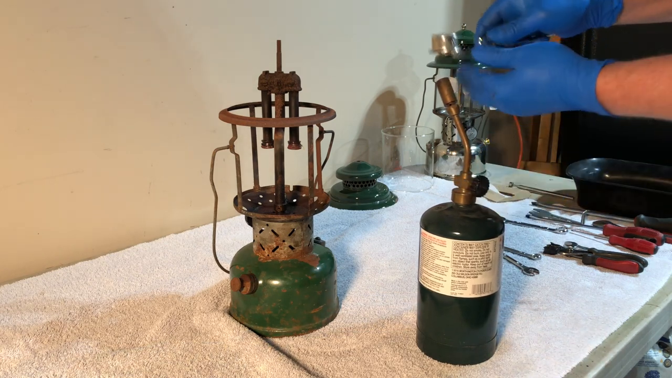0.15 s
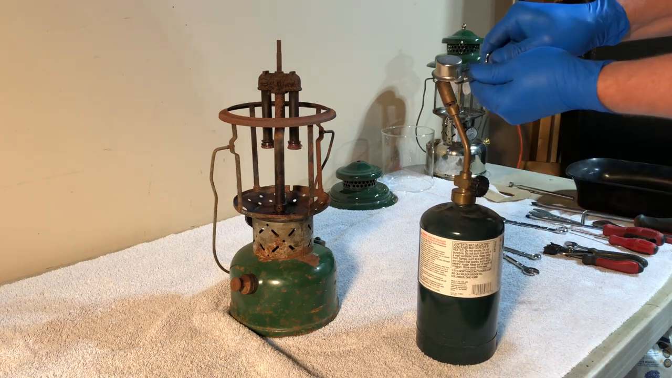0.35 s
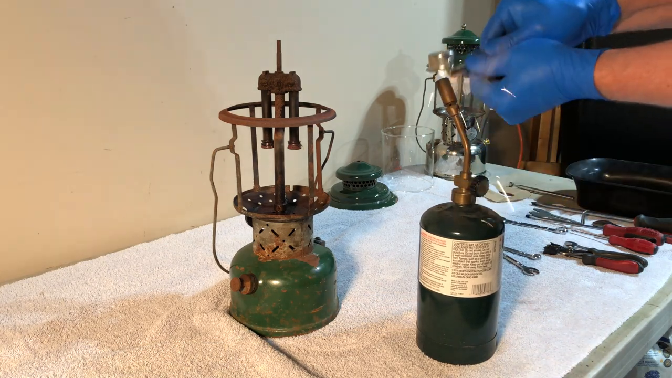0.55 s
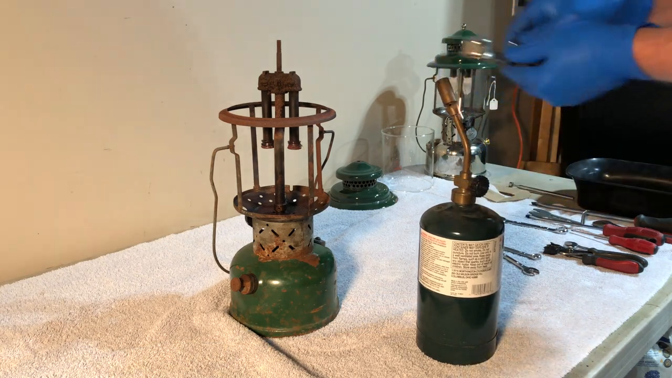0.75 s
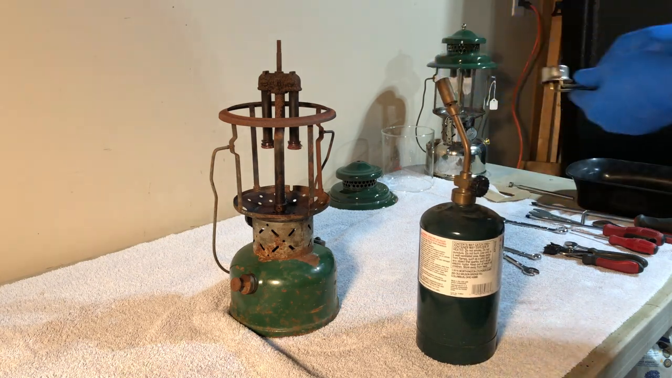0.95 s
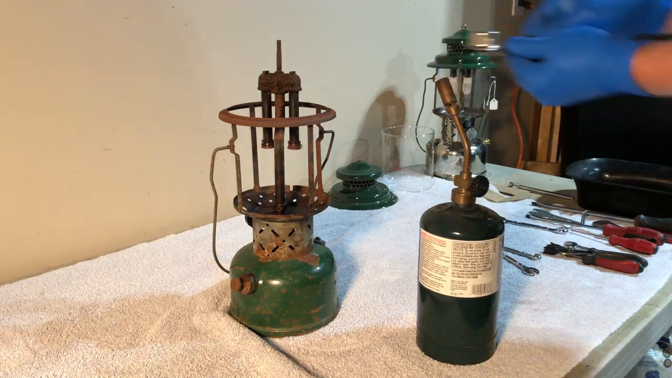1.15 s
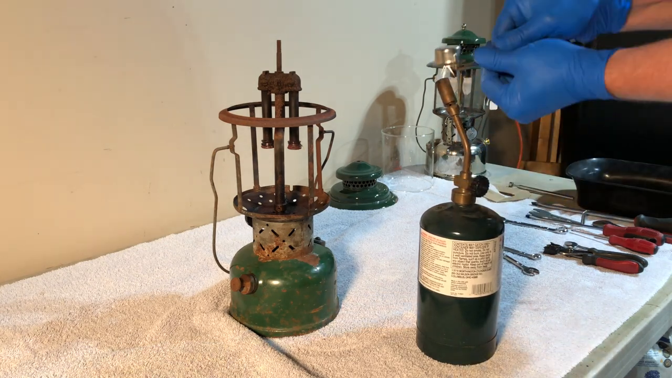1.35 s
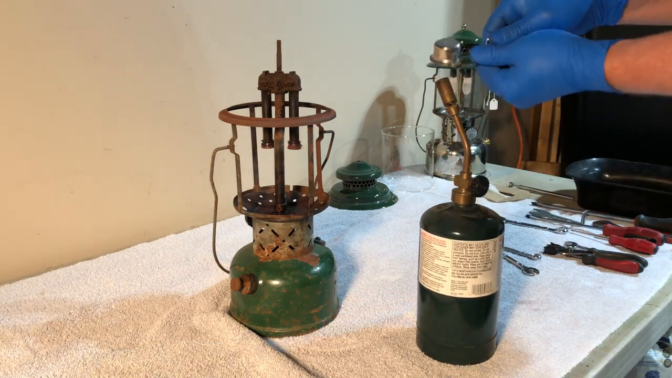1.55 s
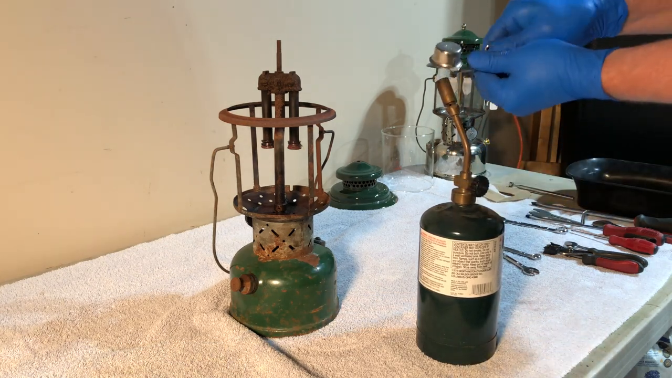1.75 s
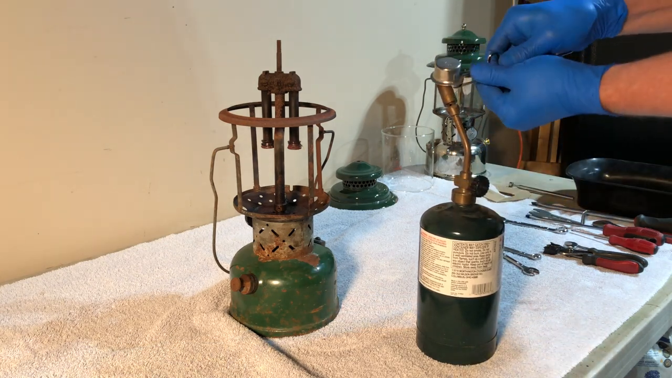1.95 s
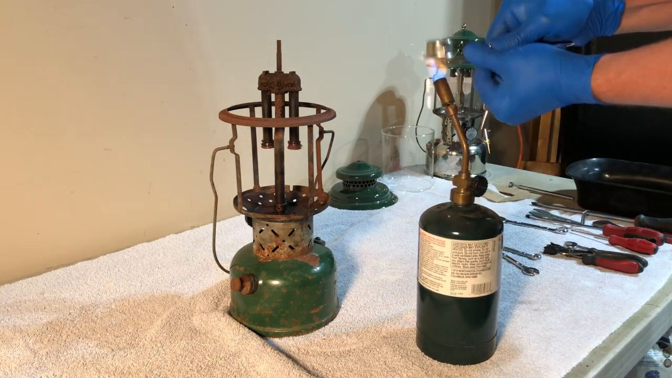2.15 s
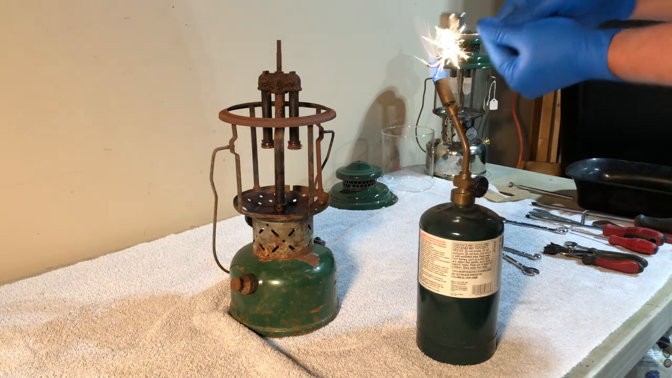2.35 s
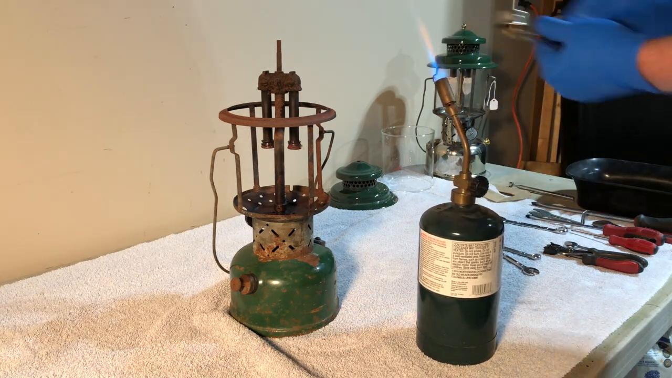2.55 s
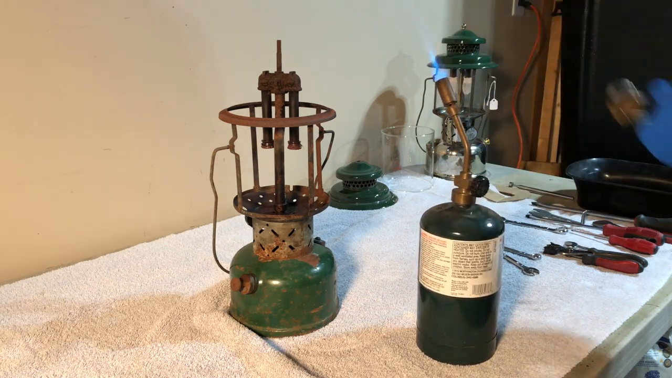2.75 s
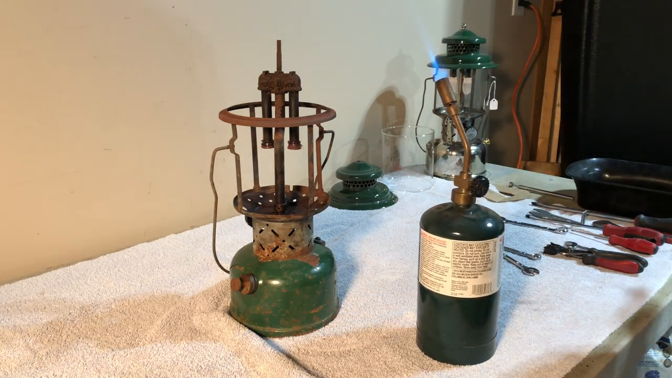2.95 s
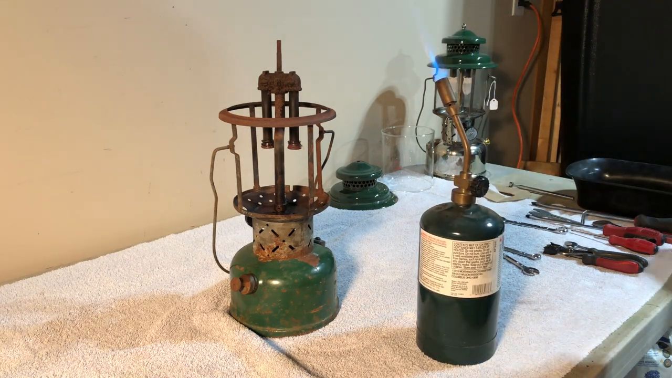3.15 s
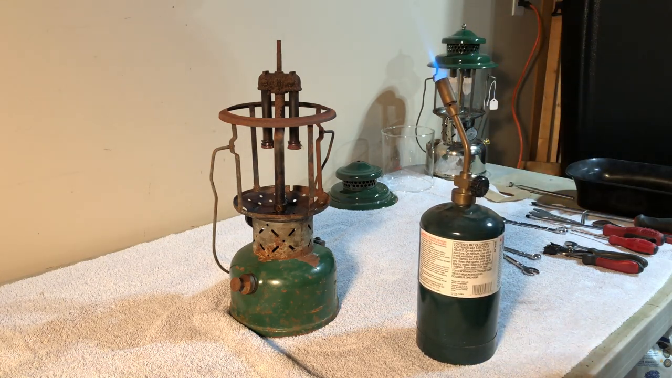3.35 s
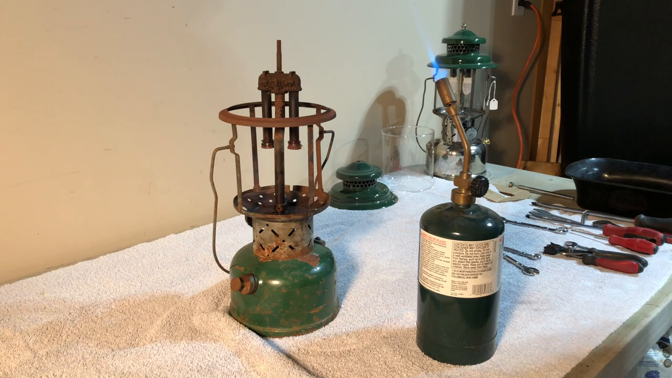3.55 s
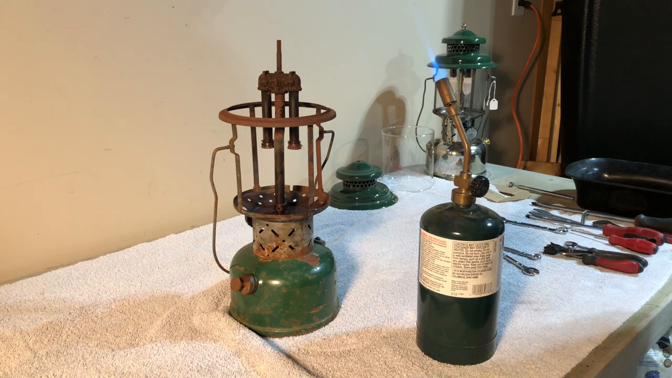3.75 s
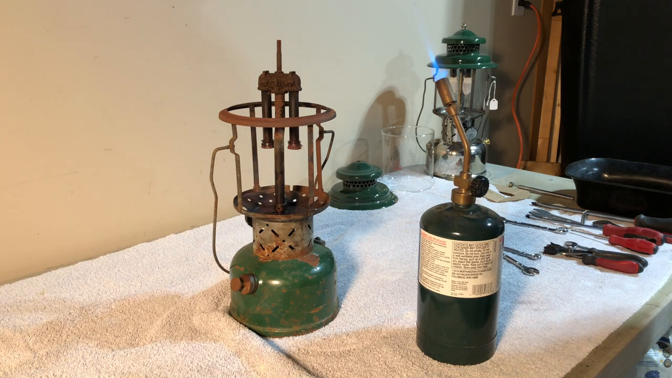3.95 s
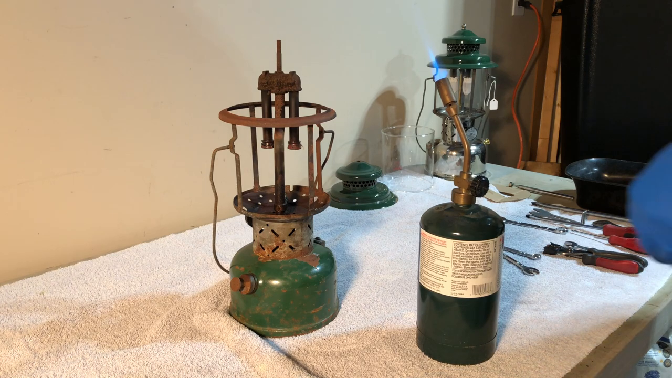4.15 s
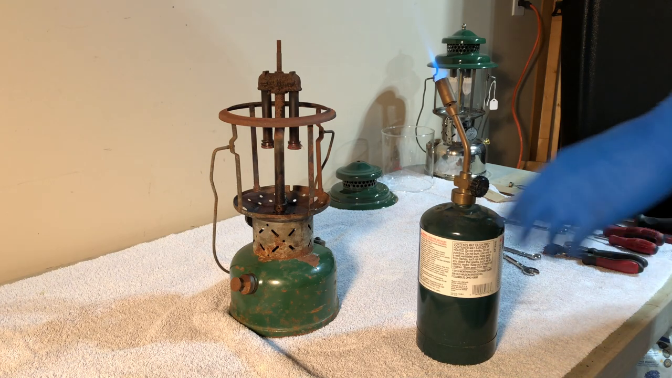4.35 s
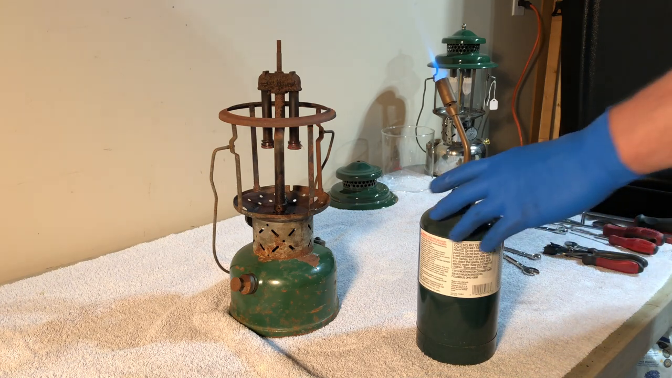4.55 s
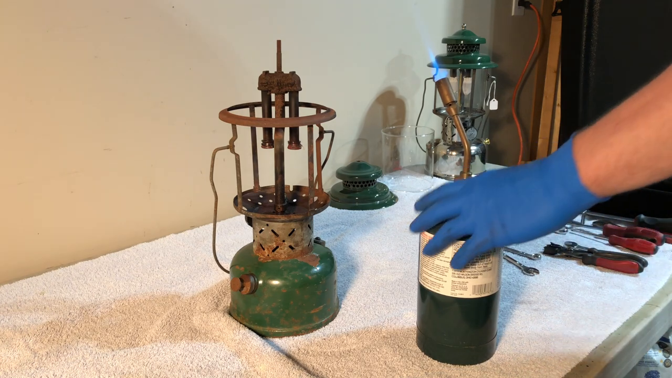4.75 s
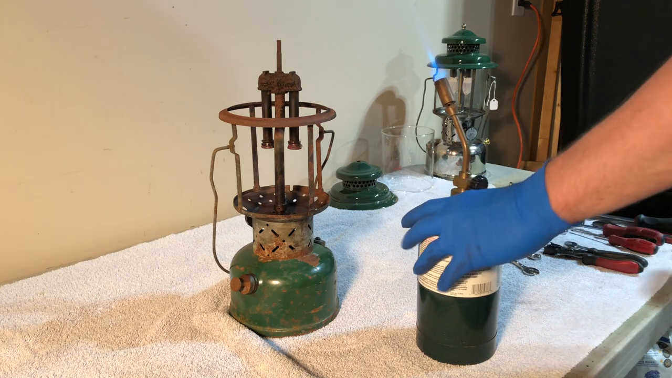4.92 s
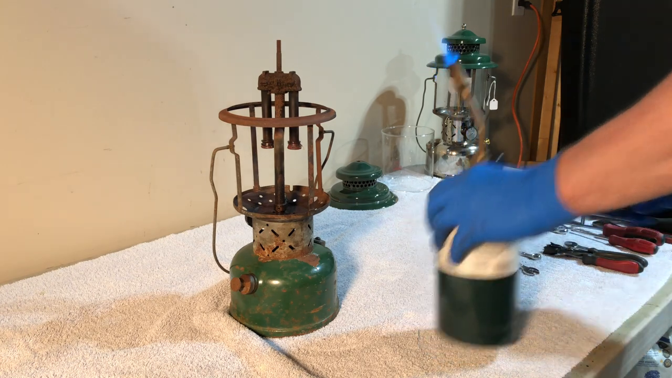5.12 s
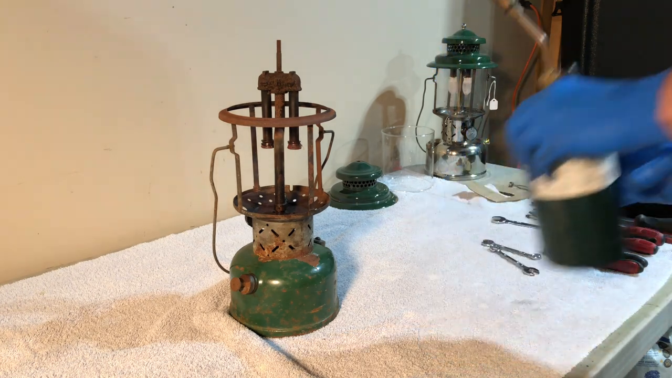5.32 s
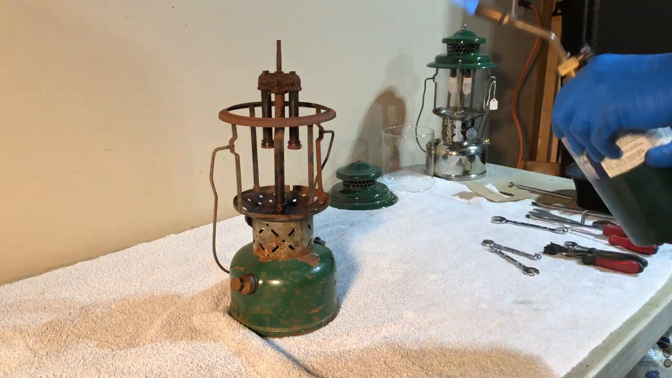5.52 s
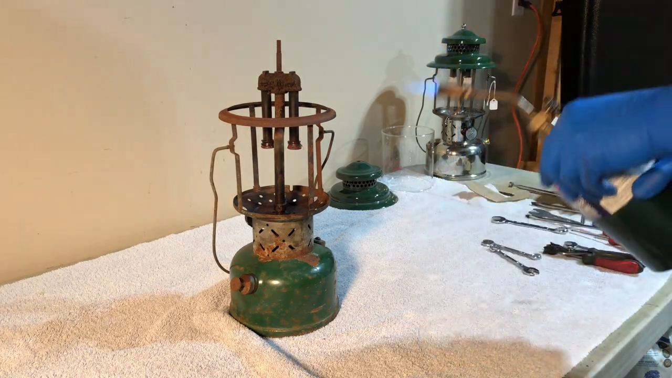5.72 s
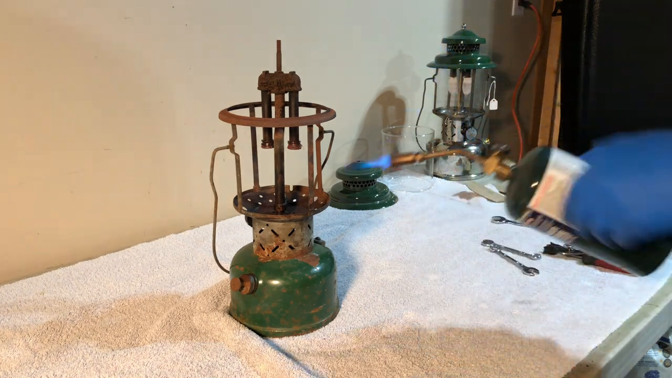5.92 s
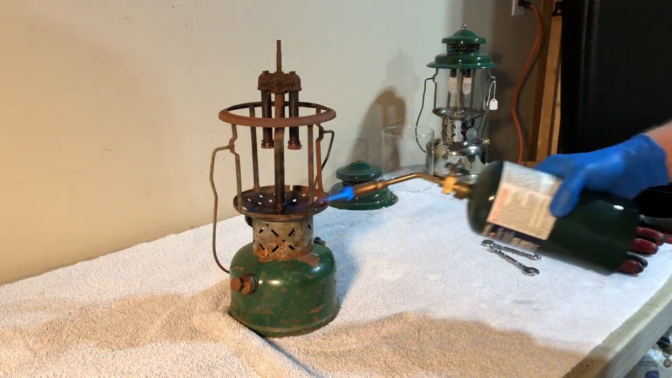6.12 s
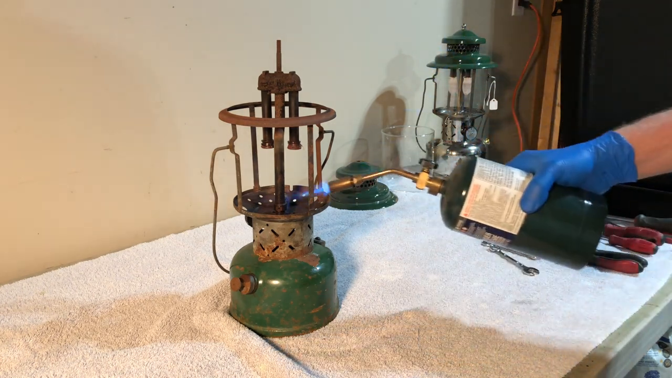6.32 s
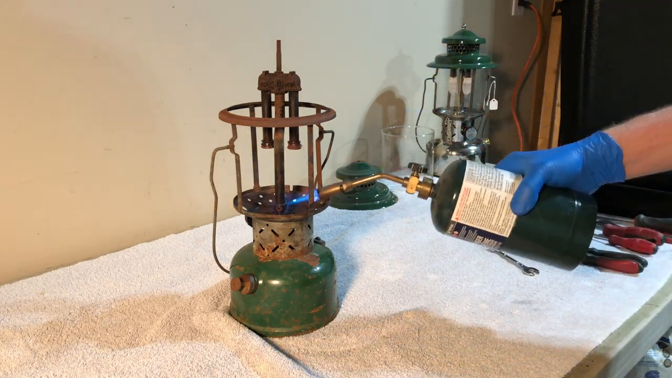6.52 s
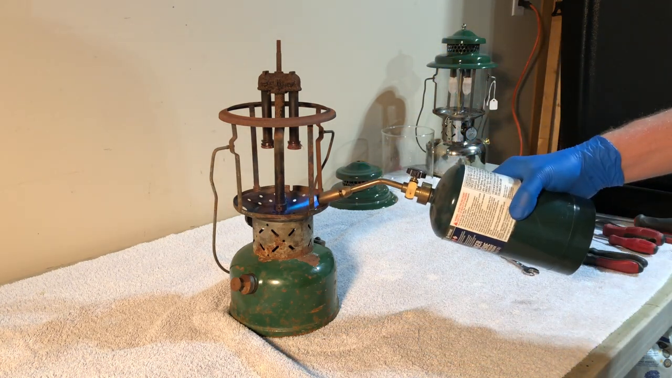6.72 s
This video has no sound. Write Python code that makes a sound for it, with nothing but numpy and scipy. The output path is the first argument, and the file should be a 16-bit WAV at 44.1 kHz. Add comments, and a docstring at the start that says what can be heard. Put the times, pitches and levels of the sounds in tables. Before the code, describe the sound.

Scratchy metallic flint clicks over hissing gas, a short howling flare, more scrapes, then a puffing ignition, rushing torch flame and dull knocks.

```python
"""A small workshop: a propane torch hisses on a bench while a flint striker is scraped at its tip.
The gas flares and blows out, then catches with a thump and roars. Dull knocks fall beside it, and the
torch is lifted and tilted down, so that its early echoes sweep through the roar. Flame and hiss are
shaped noise, the burner tube is noise in moving resonances, and struck metal is a set of dying sines."""
import sys
import numpy as np
from scipy import signal
from scipy.io import wavfile
from scipy.ndimage import uniform_filter1d

SR = 44100
rng = np.random.default_rng(int(sys.argv[2]) if len(sys.argv) > 2 else 0)


def bounce(signal):
    """Save signal as a 16-bit WAV file at the path given by the first command-line argument."""
    frames = np.transpose(np.atleast_2d(signal))
    limited = np.clip(frames, -1, 1)
    pcm = np.round(limited * 32767).astype(np.int16)
    wavfile.write(sys.argv[1], SR, pcm)


N = 298998
TIME = np.arange(N) / SR

# Spectra give relative levels; colour() scales each to unit energy.
# spectrum of the burning flame: pitch_hz, level_db (per Hz)
ROAR_SPECTRUM = [(40, -26.5), (80, -23.5), (125, -11.5), (200, -7), (330, -3.5), (600, -1.5), (950, 0.5),
                 (1400, -5), (2300, -11), (4000, -14.5), (6000, -25), (9000, -42), (16000, -45)]
# bass spectrum of the loose first flare: pitch_hz, level_db (per Hz)
BILLOW_SPECTRUM = [(30, -18), (70, -1.5), (115, 0), (300, -12), (2000, -53)]
# spectrum of gas leaving the orifice: pitch_hz, level_db (per Hz)
HISS_SPECTRUM = [(300, -38), (1200, -11.5), (2200, -6.5), (3200, -4), (5500, -5.5), (8500, -6), (10000, -3),
                 (11000, -1), (12200, 7.5), (13300, 0.5), (14500, 2.5), (15700, -4)]
# the flame burns: start_s, end_s, strength_db, catch_offset_db (added as it catches), build_up_s
BURNS = [(0.3, 0.544, 1.5, -8, 0.13), (1.91, 6.8, 0.2, 0.5, 0.13)]
# air modes of the burner tube: cold_hz, hot_hz, width_hz, level_db (relative),
# sharp_hz (added as the first flame flares)
TUBE_MODES = [(4620, 5110, 520, 0, 900), (7150, 7250, 1180, -0.5, 0), (7650, 7830, 440, -1.5, 3600)]
# early echoes from bench, side wall and back wall: standing_ms, lifted_ms, aimed_ms,
# standing_db, aimed_db
EARLY_ECHOES = [(0.836, 1.247, 0.553, -33.5, -10), (2.825, 2.997, 2.12, -12.5, -11.5),
                (3.41, 3.7, 2.45, -16.5, -16.5)]
# flint strokes and clacks: start_s, level_db (relative), length_s, tilt_db (brightness per octave)
STROKES = [(0.29, -12, 0.002, -2), (0.2955, -17.5, 0.0051, -13), (0.2977, -9.5, 0.0018, -4),
           (0.301, -31, 0.0073, -7), (0.528, -23, 0.0036, 0), (0.5323, -18, .002, 2),
           (0.539, -10.5, 0.00039, 1.5), (0.555, -15, 0.00022, 19), (1.023, -41, 0.0017, -3),
           (1.077, -41, 0.0064, -11), (1.129, -22.5, 0.0038, -13), (1.153, -27, 0.0073, -6),
           (1.158, -24, 0.0038, -7), (1.383, -26, .004, -15.5), (1.387, -19, 0.0088, -4.5),
           (1.409, -28, .003, -13), (1.4155, -21.5, 0.0012, -13), (1.4355, -7, 0.0012, 3.5),
           (1.8997, -13, 0.0026, 2), (1.902, -19, 0.0092, -1), (1.9186, -8, 0.00084, 7),
           (2.193, -32, .003, 0), (2.2137, -22, 0.0033, 8), (2.2175, -8.5, 0.0016, 13)]
# steel spring and cup of the striker: pitch_hz, level_db (relative), t60_s
STRIKER_MODES = [(2840, -14, 0.032), (3147, -6, 0.019), (3700, -7, 0.016), (5450, -15, 0.064),
                 (6510, 1.5, 0.02), (7390, 11.5, 0.038), (7470, 1, 0.023), (7800, 3, 0.018),
                 (8540, 0, 0.0089), (9020, 3, 0.014), (9750, 0, 0.017), (10550, -4.5, 0.016),
                 (10700, -24, 0.018), (12100, -30, 0.022), (13700, -18, 0.013), (15360, -10.5, .055)]
# spectrum of flint grit: pitch_hz, level_db (per Hz), tilt_share (how much stroke tilt is added)
GRIT_SPECTRUM = [(200, -38, 0), (1500, -16.5, 0), (3100, -6.5, -1), (4500, -3, 0),
                 (7200, 6, 0), (10000, -4.5, 0.5), (15000, 6, 1)]
# the striker bumps the torch: start_s, level_db (relative), contact_lowpass_hz, tick_db (relative),
# spot_hz (mode this spot excites most), damping_db_per_s (by the striker)
BUMPS = [(0.189, -50, 6000, 19.5, 1780, 2), (1.9008, -21.5, 11600, 9, 4830, 128)]
# brass neck and steel bottle: pitch_hz, level_db (relative), t60_s
TORCH_MODES = [(686, -2.5, 0.25), (1430, -0.5, 0.18), (1779, -2.5, 0.69), (2140, -3.5, 0.14),
               (3070, 2, 0.06), (3070, 12, 0.08), (3780, -3, 0.093), (4870, 0, 0.1), (4860, -1.5, 0.1),
               (5390, -5, 0.22), (7470, 7, .06), (10900, 8, 0.088), (11270, 11, 0.087)]
# spectrum of the dry tick of a bump: pitch_hz, level_db (per Hz)
TICK_SPECTRUM = [(200, -4), (1200, 2.5), (3500, 11), (6000, -9), (15000, -17)]
# the gas catches: start_s, level_db (relative), pulse_width_s
THUMPS = [(0.3107, -11, 0.0017), (1.9271, -15.5, 0.0011), (1.9301, -12.5, 0.0017)]
# spectrum of the ragged puff in a thump: pitch_hz, level_db (per Hz)
PUFF_SPECTRUM = [(100, -14), (500, -1), (1000, 10), (1600, -16), (4000, -5), (16000, -42)]
# dull knocks and shuffles beside the torch: start_s, level_db (relative), t60_s
KNOCKS = [(1.13, -42, 0.088), (1.156, -50.5, 0.37), (1.388, -58, 0.092), (3.4525, -10.5, 0.053),
          (3.463, -13, 0.067), (3.516, -16, 0.085), (3.579, -24, 0.055), (3.816, -30.5, 1)]
# spectrum of a knock: pitch_hz, level_db (per Hz)
KNOCK_SPECTRUM = [(35, -35), (60, -1), (85, -2), (150, -2.5), (250, -1.5), (500, -7.5), (820, 3), (1120, 1),
                  (1700, -10), (3000, -12.5), (4500, -18.5), (8000, -18.5), (12000, -36), (16000, -27)]
# low rumble of stirred air: peak_s, peak_db, rise_s, fall_db_per_s
GUSTS = [(.3, -54, .3, 21), (1.0, -59, 0.33, 21), (1.95, -42, .04, 50), (2.34, -47.5, .08, 40),
         (2.8, -57, 0.27, 22)]
# spectrum of the room tone: pitch_hz, level_db (per Hz)
FLOOR_SPECTRUM = [(20, -7), (60, -6), (120, -7), (300, -9), (1000, -1), (4000, -10.5), (16000, -43)]
# decay of the diffuse tail: pitch_hz, t60_s
ROOM_DECAY = [(60, 0.83), (250, 0.8), (1000, 0.77), (3500, 0.81), (5000, 0.61), (8000, 0.25), (16000, 0.45)]
# standing waves of the room: pitch_hz, level_db, t60_s
STANDING_WAVES = [(119.1, -55, 0.5), (291, -66.5, 0.96), (385.7, -43, 0.067), (585, -60, 0.48),
                  (617, -53.5, 0.6), (709, -56, 0.63), (898, -50, 0.13)]
# the striker's cup covers the nozzle: start_s, end_s
COVERED = [(0.15, 0.3), (1.1, 2.1)]

ROAR_DB, CATCH_S, BLOWOUT_DB_PER_S = -32.5, 0.0076, 550
HISS_DB, DEEP_DB, HIGH_DB = -42.5, -45.5, -46.5  # orifice hiss, deep tube mode, two high tube modes
FLARE_DEEP_DB, FLARE_HIGH_DB = 12, 8.5  # the tube howls during the first flame
SINK_S = 0.041  # decay constant as the sharpened modes sink back
SPUTTER_DB = 1  # rms surge of the tube level
SPIT_DB, SPIT_S = 13, 0.09  # extra hiss when the gas catches, and its decay constant
COVER_DB, HAND_S = -7, 0.09  # the cup damps the deep mode; time the hand takes to move
LIFT_START_S, AIM_START_S, AIM_END_S = 5.03, 5.35, 6.05
AWAY_DB = -7.948  # the high modes dim where the lifted torch faces away
EDGE_HZ = 15800  # final band limit


def flame(billow_db):
    """Turbulent burning at the nozzle; the loose first flare also billows in the bass."""
    start, end = BURNS[0][:2]
    roar = amp(ROAR_DB) * turbulence(ROAR_SPECTRUM, patchy_db=0.5, flutter_db=0.67, flutter_hz=45)
    bass = unit(colour(rng.standard_normal(N), BILLOW_SPECTRUM))
    billow = gate(start, end, edge_s=0.032) * bass
    return burning() * roar + amp(billow_db) * billow


def burning():
    """Flame strength: it catches at once, builds up, holds, and dies quickly when blown out."""
    strength = np.zeros(N)
    for start, end, db, offset_db, build_s in BURNS:
        young = 1 - np.clip((TIME - start) / build_s, 0, 1) ** 2
        catch = np.clip((TIME - start) / CATCH_S, 0, 1)
        blowout_db = BLOWOUT_DB_PER_S * np.maximum(TIME - end, 0)
        strength += catch * amp(db + offset_db * young - blowout_db)
    return strength


def jet():
    """Gas hisses from the orifice and rings the burner tube, whose modes rise once the gas is hot."""
    flare_start, flare_end = BURNS[0][:2]
    heat = lowpass(np.clip(2 * burning(), 0, 1), 2.5, order=1)
    flare = gate(flare_start, flare_end, edge_s=0.035)
    overshoot = (TIME > flare_start) * np.exp(-abs(TIME - flare_start) / SINK_S)
    spit = sum(gate(start, end, CATCH_S) * np.exp(-abs(TIME - start) / SPIT_S)
               for start, end, *_ in BURNS)
    covered = sum(gate(start, end, HAND_S) for start, end in COVERED) * (1 - flare)
    deep_db = DEEP_DB + FLARE_DEEP_DB * flare + COVER_DB * covered
    high_db = HIGH_DB + FLARE_HIGH_DB * flare + AWAY_DB * np.sqrt(pose(0, 1, 0))
    hiss = turbulence(HISS_SPECTRUM, patchy_db=0.3, flutter_db=0.15, flutter_hz=20)
    tube = np.zeros(N)
    for (cold, hot, width, db, sharp), drive_db in zip(TUBE_MODES, [deep_db, high_db, high_db]):
        surge_db = SPUTTER_DB * unit(lowpass(rng.standard_normal(N), 72))
        hz = cold + (hot - cold) * heat + sharp * overshoot
        hz = hz * (1 + 0.0028 * surge_db)  # each surge also lifts the pitch
        # two passes at double width give a steeper peak
        tone = resonate(rng.standard_normal(N), hz, 2 * width)
        tone = unit(resonate(tone, hz, 2 * width))
        tube += amp(db + drive_db + surge_db - SPUTTER_DB / 3) * tone
    return amp(HISS_DB + SPIT_DB * spit) * hiss + tube


def echoes(x, soft_hz):
    """Bench and walls return the torch a few milliseconds late, a comb that sweeps as it moves."""
    soft = lowpass(x, soft_hz, order=1)
    out = x.copy()
    for standing_ms, lifted_ms, aimed_ms, standing_db, aimed_db in EARLY_ECHOES:
        delay_ms = pose(standing_ms, lifted_ms, aimed_ms)
        level_db = pose(standing_db, (standing_db + aimed_db) / 2, aimed_db)
        out += amp(level_db) * np.interp(TIME - delay_ms / 1000, TIME, soft)
    return out


def pose(standing, lifted, aimed):
    """Carries a quantity through the three positions of the torch."""
    return np.interp(TIME, [LIFT_START_S, AIM_START_S, AIM_END_S], [standing, lifted, aimed])


def striker(grit_db, grit_t60):
    """The flint skips over the file: a burst of tiny slips rings the steel and adds dry grit."""
    out, t = np.zeros(N), np.arange(SR // 3) / SR
    for s, db, length, tilt_db in STROKES:
        slips = rng.standard_normal(len(t)) * amp(3.6 * rng.standard_normal(len(t)))
        # a short clack stops dead, a long scrape trails off
        contact = amp(-60 * np.maximum(t - length, 0) / (grit_t60 + 4 * length))
        spectrum = [(hz, level + share * tilt_db) for hz, level, share in GRIT_SPECTRUM]
        grit = colour(slips * contact, spectrum)
        # about 1500 slips a second, after a firm first hit
        teeth = (rng.random(len(t)) < 1500 / SR) * (t < length) * slips / 2
        teeth[0] = 2
        # the squeeze of the hand detunes the spring a little from stroke to stroke
        modes = [(hz * (1 + 0.003 * rng.standard_normal()), level, t60)
                 for hz, level, t60 in STRIKER_MODES]
        steel = signal.fftconvolve(teeth, ring(modes, tilt_db))[:len(t)]
        sound = steel / np.linalg.norm(steel) + amp(grit_db) * grit / np.linalg.norm(grit)
        # a longer stroke carries more energy
        add(out, s, amp(db - 1.5) * sound * np.sqrt((length + 0.0017) * SR))
    return out


def bumps(tick_t60, spot_db):
    """The torch ticks and rings when the striker touches it; a soft touch is duller."""
    out, t = np.zeros(N), np.arange(SR // 3) / SR
    for s, db, contact_hz, tick_db, spot_hz, damping in BUMPS:
        tick = amp(tick_db - 60 * t / tick_t60) * rng.standard_normal(len(t))
        tick = colour(tick, TICK_SPECTRUM)
        # modes near the spot's pitch are boosted
        modes = [(hz, level + spot_db * np.exp(-(10 * np.log(hz / spot_hz)) ** 2), t60)
                 for hz, level, t60 in TORCH_MODES]
        metal = ring(modes, 0) * amp(-damping * t)
        add(out, s, amp(db) * lowpass(metal + tick, contact_hz, order=1))
    return out


def ring(modes, tilt_db):
    """Dying sines of a struck metal part, brighter for a higher tilt per octave."""
    t = np.arange(SR // 3) / SR
    centre = np.mean([mode[0] for mode in modes])
    out = np.zeros(len(t))
    for hz, db, t60 in modes:
        decay = amp(db + tilt_db * np.log2(hz / centre) - 60 * t / t60)
        out += decay * np.sin(2 * np.pi * (hz * t + rng.random()))
    return out


def thumps():
    """Gas gathered at the tip expands at once: a push of air, a slower suck back and a ragged puff."""
    out, t = np.zeros(N), np.arange(SR // 8) / SR
    for s, db, width in THUMPS:
        u = t / width
        push = 2 * (2 - u)  # turns negative for the suck back
        puff = colour(rng.standard_normal(len(t)), PUFF_SPECTRUM)
        add(out, s, amp(db) * u * np.exp(-u) * (push + amp(1.5) * puff))
    return signal.sosfilt(signal.butter(1, 45, "high", fs=SR, output="sos"), out)


def knocks():
    """Dull blows: dying noise stands in for many close, well-damped modes."""
    out, t = np.zeros(N), np.arange(SR // 3) / SR
    for s, db, t60 in KNOCKS:
        burst = rng.standard_normal(len(t)) * amp(-60 * t / t60)
        add(out, s, amp(db) * colour(burst, KNOCK_SPECTRUM))
    return out


def air():
    """Room tone and slow gusts of stirred air that swell and fade."""
    rumble = unit(lowpass(rng.standard_normal(N), 29, order=3))
    gusts = np.zeros(N)
    for s, db, rise_s, fall in GUSTS:
        swell = np.clip(1 + (TIME - s) / rise_s, 0, 1)
        gusts += swell * amp(db - fall * np.maximum(TIME - s, 0))
    return amp(-60.5) * colour(rng.standard_normal(N), FLOOR_SPECTRUM) + gusts * rumble


def room(x):
    """A diffuse tail, each band dying at its own speed."""
    t = np.arange(SR) / SR
    hz, when, z = signal.stft(rng.standard_normal(SR) * (t > 0.005), SR, nperseg=256)
    decay = amp(-60 * when / read(ROOM_DECAY, hz)[:, None])
    tail = signal.istft(z * decay, SR, nperseg=256)[1][:SR]
    tail = lowpass(tail, 15500)
    tail = signal.sosfilt(signal.butter(2, 150, "high", fs=SR, output="sos"), tail)
    return signal.fftconvolve(x, tail / np.linalg.norm(tail))[:N]


def standing_waves(x):
    """The small room keeps ringing at a few low pitches."""
    t = np.arange(SR) / SR
    waves = sum(amp(db - 60 * t / t60) * np.cos(2 * np.pi * hz * t) for hz, db, t60 in STANDING_WAVES)
    return signal.fftconvolve(x, waves)[:N]


def turbulence(points, patchy_db, flutter_db, flutter_hz):
    """Noise whose level boils in small patches and flutters as a whole."""
    _, _, z = signal.stft(rng.standard_normal(N), SR, nperseg=512, noverlap=384)
    patches = uniform_filter1d(rng.standard_normal(z.shape), size=7, axis=0)  # across pitch
    patches = unit(uniform_filter1d(patches, size=12, axis=1))  # across time
    boiling = signal.istft(z * amp(patchy_db * patches), SR, nperseg=512, noverlap=384)[1][:N]
    flutter = unit(lowpass(rng.standard_normal(N), flutter_hz))
    return unit(colour(boiling, points) * amp(flutter_db * flutter))


def resonate(x, hz, width):
    """A resonance of gain 1 that follows the curve hz: shift down, smooth, shift back up."""
    turn = np.exp(2j * np.pi * np.cumsum(hz) / SR)
    r = np.exp(-np.pi * width / SR)
    return 2 * (turn * signal.lfilter([1 - r], [1, -r], x / turn)).real


def colour(x, points):
    """Causal minimum-phase filter with the given spectrum and unit energy."""
    size = 4096
    log_gain = np.log(amp(read(points, abs(np.fft.fftfreq(size, 1 / SR)))))
    taps = np.fft.ifft(np.exp(np.conj(signal.hilbert(log_gain)))).real[:size // 2]
    return signal.oaconvolve(x, taps / np.linalg.norm(taps))[:len(x)]


def read(points, hz):
    """Reads a spectrum or decay table on a log-frequency axis."""
    f, value = np.transpose(points)
    return np.interp(np.log(hz + 1), np.log(f + 1), value)


def lowpass(x, hz, order=2):
    """Causal low-pass."""
    return signal.sosfilt(signal.butter(order, min(hz, 0.45 * SR), fs=SR, output="sos"), x)


def gate(start, end, edge_s):
    """Rises from 0 to 1 after start and falls back after end."""
    return np.clip((TIME - start) / edge_s, 0, 1) - np.clip((TIME - end) / edge_s, 0, 1)


def amp(db):
    """Decibels to gain."""
    return 10 ** (np.asarray(db) / 20)


def unit(x):
    """Scales to rms 1."""
    return x / np.sqrt(np.mean(x ** 2) + 1e-20)


def add(mix, s, sound):
    """Lays a sound into the mix at time s."""
    part = mix[round(s * SR):][:len(sound)]
    part += sound[:len(part)]


def scene():
    """Torch, striker and knocks in a small workshop, the same in both channels."""
    torch = echoes(flame(billow_db=-42.5) + jet(), soft_hz=7040)
    scrape = striker(grit_db=1.5, grit_t60=0.027)
    bump = bumps(tick_t60=0.031, spot_db=9)
    thump = thumps()
    knock = knocks()
    tail = room(amp(-8.5) * torch + amp(-10.5) * (scrape + bump) + amp(-7.5) * thump + amp(-7) * knock)
    boom = standing_waves(amp(-4.5) * torch + amp(-11) * knock + amp(2) * thump)
    mono = torch + scrape + bump + thump + knock + air() + tail + boom
    return np.array([mono, mono])


def record(dry):
    """Peaks above full scale overload and clip; then a steep low-pass limits the band."""
    band_limit = signal.firwin(511, EDGE_HZ, window=("kaiser", 9), fs=SR)
    return signal.oaconvolve(np.clip(dry, -1, 1), band_limit[None], "same")


dry = scene()
out = record(dry)
bounce(out)
```